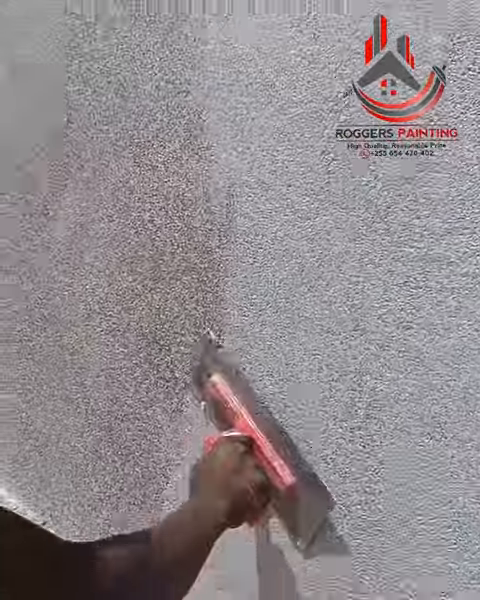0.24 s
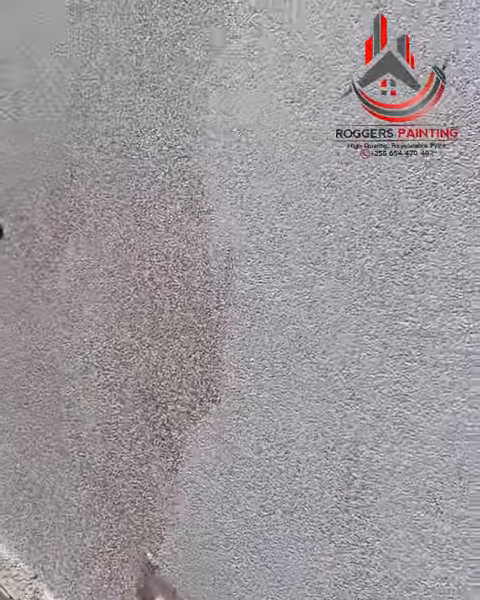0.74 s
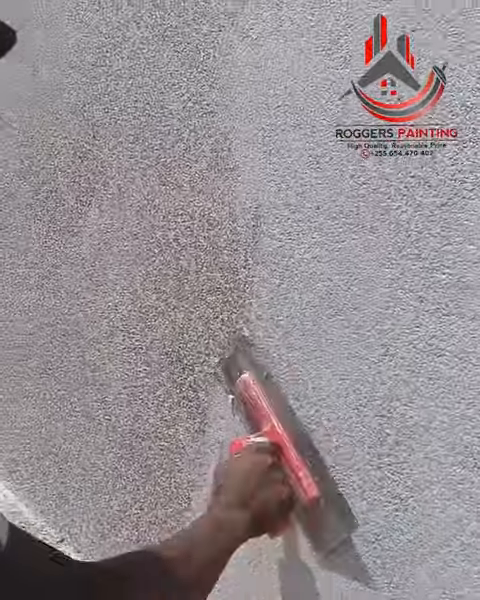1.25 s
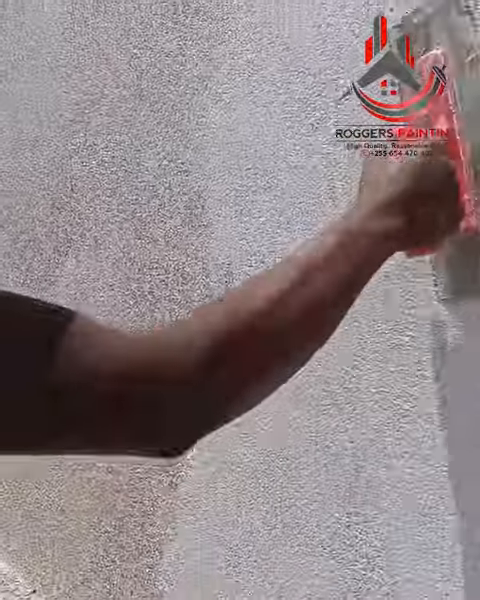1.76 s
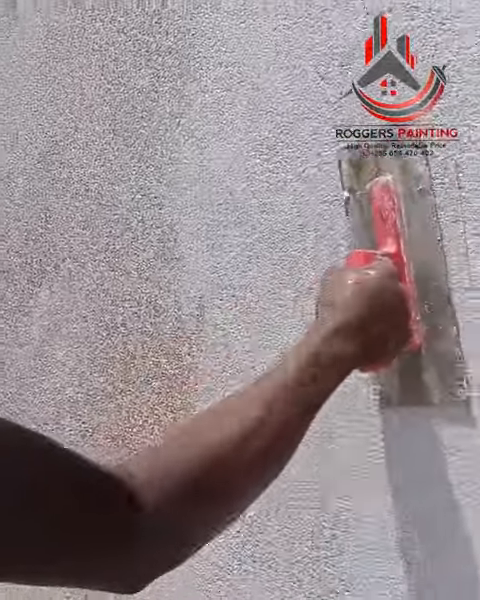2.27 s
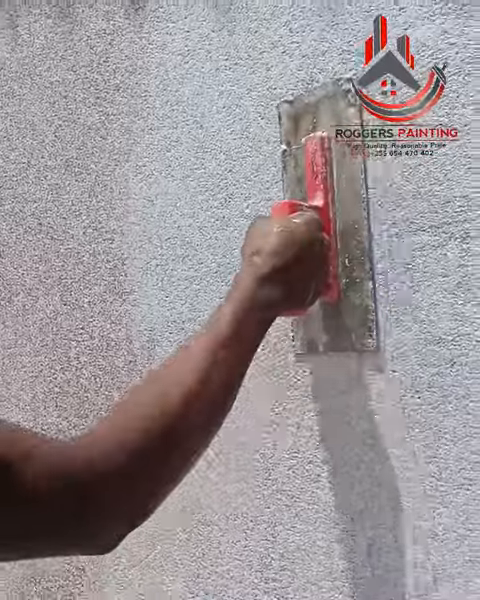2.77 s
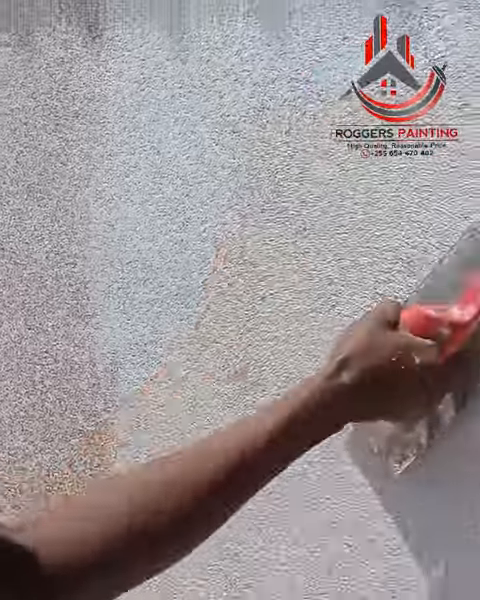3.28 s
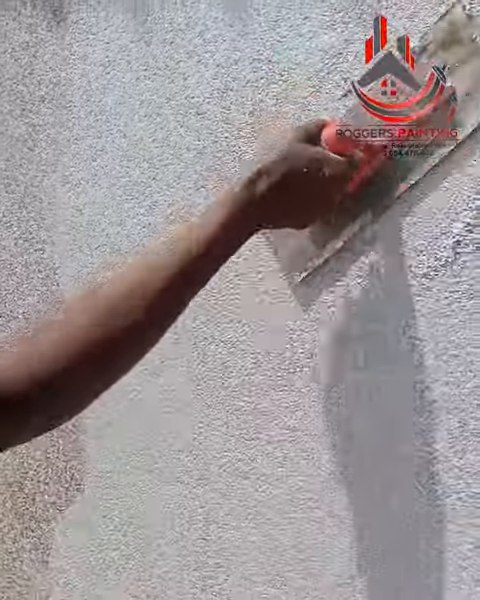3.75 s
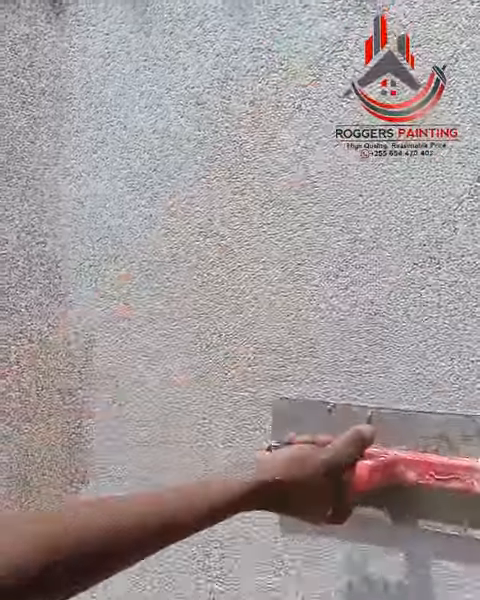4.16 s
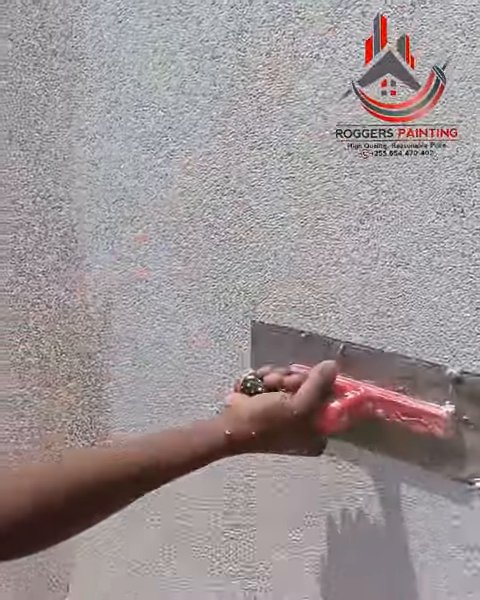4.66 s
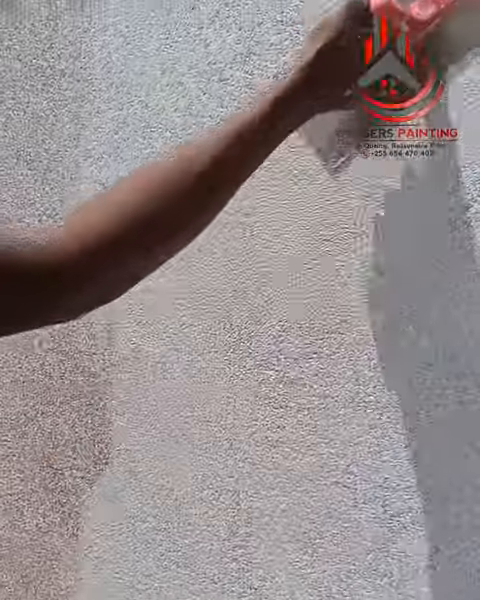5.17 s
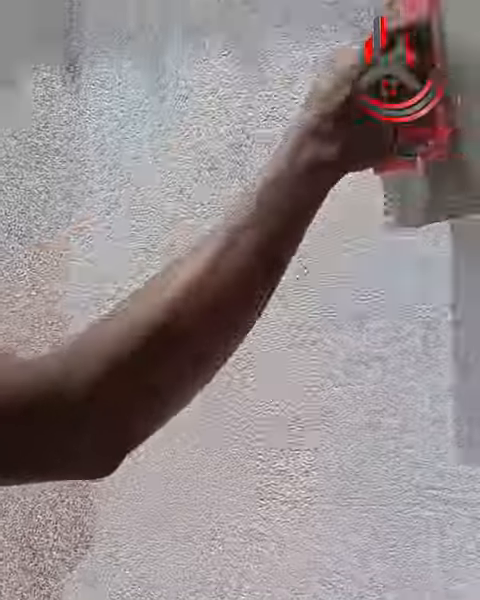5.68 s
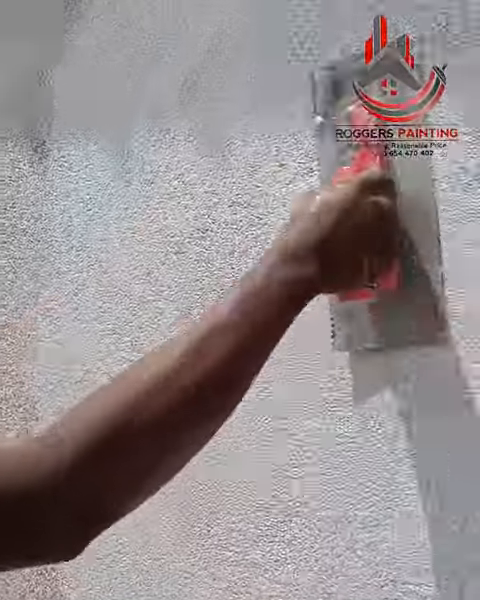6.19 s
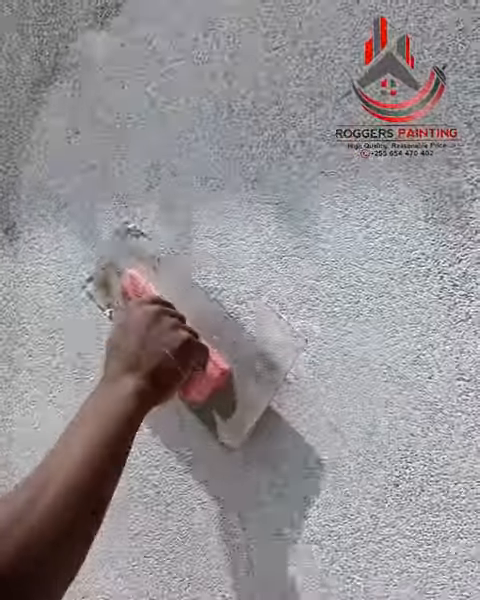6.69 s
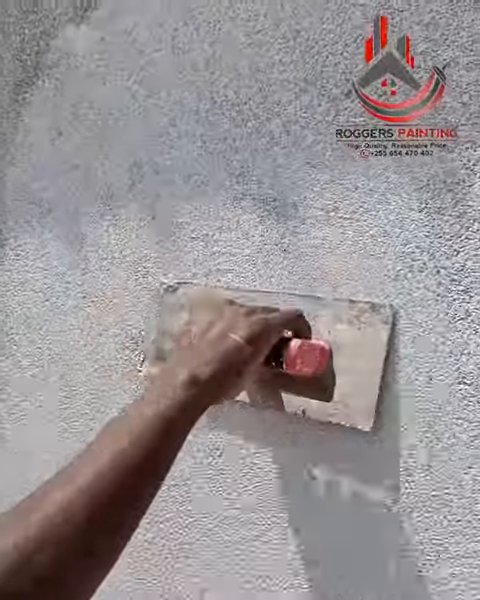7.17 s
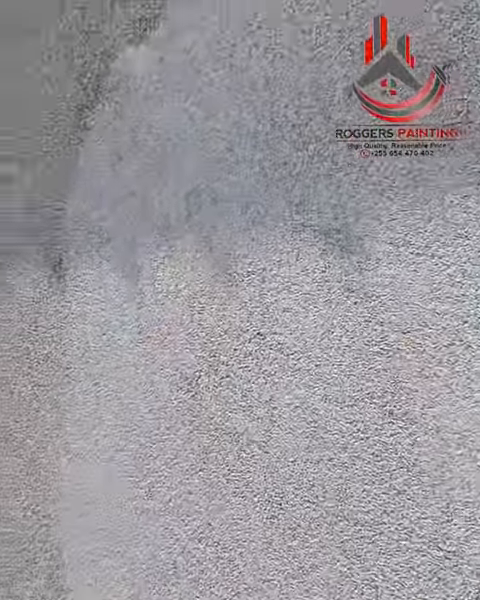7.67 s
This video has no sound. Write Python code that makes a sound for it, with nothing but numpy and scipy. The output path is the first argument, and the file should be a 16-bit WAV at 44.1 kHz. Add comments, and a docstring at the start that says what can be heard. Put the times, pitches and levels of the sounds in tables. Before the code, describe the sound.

Outdoors, close to a wall, a steel plastering trowel makes eight gritty rasping strokes, each around half a second to nearly a second. Sand hisses beneath the blade, which rings dully and clacks when landing or catching stones. Short pauses reveal low wind buffeting. A faint motor hum enters halfway. The close microphone hears a nearly dry sound with only weak, short reflections.

```python
"""Outdoors, close to a wall: a steel trowel rubs sandy coating onto it in eight rasping strokes.
Fine sand, as filtered grain noise, hisses under the blade; coarse grains are random impacts that ring its
well-damped modes; where it lands or catches on a stone it clacks, with weak reflections from nearby surfaces.
Moving air, as shaped noise, buffets the microphone. Far off, a wavering sine hums like a motor,
with faint gliding whines and an uneven hush."""
import sys
import numpy as np
from scipy import signal
from scipy.fft import rfft, irfft, next_fast_len
from scipy.io import wavfile
from scipy.ndimage import uniform_filter1d, map_coordinates

SR = 44100
rng = np.random.default_rng(int(sys.argv[2]) if len(sys.argv) > 2 else 0)


def log_audio(samples):
    """Write samples as a 16-bit WAV file to the path given in sys.argv[1]."""
    # one column per channel
    frames = np.atleast_2d(samples).T
    # limit to full scale, then quantise
    limited = np.clip(frames, -1, 1)
    pcm = np.round(limited * 32767).astype(np.int16)
    wavfile.write(sys.argv[1], SR, pcm)


N = 349829  # length [samples]

# each layer at the wall, relative to the pressure [dB]
SAND_DB, FACE_DB, EDGE_DB, DRAG_DB = -6, -1, -2, -13.5
EDGE_BITE, DRAG_BITE, SAND_BITE = 0.039, 0.71, -0.2  # gained per dB of bite [dB]


def contact(pressure_db, bite_db):
    """Gains of drag, face, edge and sand: all follow the pressure; biting grit favours the low, slow ones."""
    layers_db = np.array([DRAG_DB + DRAG_BITE * bite_db,
                          FACE_DB + bite_db,
                          EDGE_DB + EDGE_BITE * bite_db,
                          SAND_DB + SAND_BITE * bite_db])
    return amp(pressure_db + layers_db)


LIFT_DB_PER_S = 750.5  # the rasp dies this fast as the blade leaves the wall
EASE_S = 0.012  # inertia of the arm


def stroke_gains(hand, t, land_s, lift_s, attack_s, drift_db_per_s):
    """One stroke: the blade settles on the wall, follows the hand as the wrist turns its edge, and lifts off."""
    landing = np.clip((t - land_s) / attack_s, 0, 1)
    envelope = landing * amp(-LIFT_DB_PER_S * np.maximum(t - lift_s, 0))
    ease = max(int(EASE_S * SR), 1)
    pressure_db, bite_db = uniform_filter1d(np.array(curves(hand, t)), ease, axis=1, mode="nearest")
    drag, face, edge, sand = envelope * contact(pressure_db, bite_db)
    turn = amp(drift_db_per_s * (t - (land_s + lift_s) / 2))
    return drag, face, edge * turn, sand / np.sqrt(turn)


# strokes on the wall: (blade lands [s], lifts [s], attack [s], edge ring drift as the wrist turns [dB/s],
# stiffening of the modes [factor], tilt of the face modes [dB/octave], tilt of the sand hiss [dB/octave],
# finest fizz [dB], drag [dB], edge ring [dB])
STROKES = [(0, 0.485, 0.0016, 5.5, 1.007, 5.5, 6, -11, -5, -1),
           (1.12, 1.958, 0.014, 4, 0.986, 2.5, 5, -11.5, -4.5, 0.5),
           (2.222, 2.647, 0.034, 3.5, 1.006, -3, -2.5, -6.5, -0.5, -1),
           (3.008, 3.458, 0.016, -1, 1.006, -8.5, -1, -4.5, -1, -0.5),
           (3.873, 4.503, 0.0099, 7, 0.985, 6, -.5, -2.5, 3.5, -0.5),
           (4.79, 5.608, 0.028, -7, 0.976, -0.5, -5.5, -8.5, 1.5, 0.5),
           (6.286, 6.738, 0.0092, -2, 1.034, -7.5, -4.5, -8, -1, 1),
           (7.15, 7.947, 0.12, -4.5, 0.982, 1.5, -2, -6.5, 2, 1)]
# the hand, one list per stroke: (time [s], pressure as the level of the rasp [dB],
# bite of the coarse grit relative to it [dB])
HAND = [
    [(0.01, -46, 5.0), (0.05, -47.5, -1.5), (0.065, -45, -2), (0.18, -44.5, -1), (0.22, -46.5, -6.5),
     (0.265, -43, -2.5), (0.3, -46, -1), (0.405, -36.5, 0.5), (0.49, -44, 4)],
    [(1.13, -59.5, -2.5), (1.425, -35.5, 3.5), (1.525, -41, -0.5), (1.55, -36.0, 2.5), (1.63, -39.5, -3),
     (1.8, -36.0, -6), (1.86, -43, -12), (1.895, -40.0, 0.5), (1.945, -50, 0)],
    [(2.23, -57, 6.5), (2.255, -58.5, -2.5), (2.285, -54, -1.5), (2.37, -45.5, -18), (2.405, -45.5, -12.5),
     (2.48, -46, -15.5), (2.555, -37.5, -5.5), (2.62, -38.0, -1.5), (2.65, -48, 0)],
    [(3.02, -52, 5.5), (3.05, -53.5, -8.5), (3.13, -44.5, -10.5), (3.155, -48.5, -13.5), (3.28, -42.5, -5),
     (3.315, -46, -6.5), (3.33, -40.5, -4), (3.42, -53.5, -9.5), (3.47, -55.5, -2.5)],
    [(3.885, -58, -10.5), (3.945, -54, -13.0), (3.995, -54, -21.5), (4.015, -49, -7.5), (4.09, -52, -12),
     (4.235, -44.5, -8.5), (4.3, -47.0, -6.5), (4.47, -41, -1), (4.505, -46, 6.5)],
    [(4.805, -56.5, -1), (4.865, -43.0, -2), (5.02, -40, -2.5), (5.09, -41.5, -5), (5.205, -43.0, 1),
     (5.345, -45.5, -6.5), (5.475, -47, -1), (5.495, -48, -10), (5.62, -46.5, 7)],
    [(6.297, -45.5, 10), (6.357, -40, 2.5), (6.412, -45, 2), (6.462, -42.5, -5), (6.527, -47, -7.5),
     (6.622, -41, 1.5), (6.637, -39, 4), (6.697, -39.5, 5), (6.74, -45, 8.5)],
    [(7.2, -50.0, 3.5), (7.245, -53, 2), (7.34, -44, -3), (7.42, -45.5, -7), (7.47, -45, -7),
     (7.51, -47.5, -7.0), (7.67, -40.5, 4), (7.695, -42.5, -1), (7.92, -42.5, 8.0)],
]
# the blade skims the wall between the last two strokes: (time [s], half length [s], pressure [dB], bite [dB])
SKIMS = [(6.799, 0.065, -66.5, 3), (6.888, .028, -57.5, 0), (6.968, .08, -70.5, 4), (7.158, 0.017, -62, -6)]
# modes of the blade pressed on the wall: (frequency [Hz], width [Hz], level [dB])
BLADE_MODES = [(753, 120, -12), (1098.4, 111, 1), (1215, 120, -1.5), (1370, 170, 2), (1594, 180, -3),
               (1830, 140, -4), (2126, 320, 5), (2485, 170, 4), (2730, 330, 4.5), (3170, 240, -5)]
FACE_COUNT = 6  # the first modes bend the face, the rest ring along the edge
# spectra of the sand hiss, the finest fizz and the drag: (frequency [Hz], density [dB per Hz])
SAND_SPECTRUM = [(900, -36.5), (2200, -8), (3400, 3), (4300, 1), (5500, -1.5), (6600, 0), (7050, -6.5),
                 (7600, -22), (8700, -32), (11000, -24), (13200, -19.5), (15800, -17)]
FIZZ_SPECTRUM = [(7000, -45), (10000, -22), (13200, -23.5), (14100, -16.5), (14900, 3), (15800, -5.5)]
DRAG_SPECTRUM = [(100, -36.5), (260, -12), (450, -0.5), (750, 1.5), (1100, 0), (2000, -30), (5000, -61)]


def scraping():
    """The blade rides over bumps in the coating, crushing fine sand and rolling coarse grit."""
    bumps = unit(wobble(45) + 0.56 * wobble(170))
    grit = grains(rate=2000, spread_db=1.0) * amp(1.4 * bumps)
    small_grit = grit + 0.51 * grains(rate=4500, spread_db=1.0) * amp(1.3 * bumps)
    fine = grains(rate=15000, spread_db=0.5) * amp(0.96 * bumps) * rng.standard_normal(N)
    rub = steady(coloured(grit * rng.standard_normal(N), DRAG_SPECTRUM))
    hiss = coloured(fine, SAND_SPECTRUM)
    hiss = steady(shifting(hiss, depth_db=2.5, patch_hz=138.1, patch_s=0.06))
    fizz = coloured(fine, FIZZ_SPECTRUM)
    fizz = steady(shifting(fizz, depth_db=1.5, patch_hz=200, patch_s=0.04)) * amp(wobble(25))

    def rasp(i, gains, stiffen=1, face_tilt_db=-3, sand_tilt_db=-3, fizz_db=-14, drag_db=3, edge_db=-3):
        """Coarse grit drives the slow bending modes, smaller grit the fast ones, over drag and sand."""
        drag, face, edge, sand = gains
        low_ring = ring(grit[i], BLADE_MODES[:FACE_COUNT], stiffen)
        low_ring = tilted(low_ring, face_tilt_db, low_hz=1100, high_hz=2200)
        low_ring = steady(shifting(low_ring, depth_db=3.3, patch_hz=120.4, patch_s=0.04), span=0.05)
        high_ring = ring(small_grit[i], BLADE_MODES[FACE_COUNT:], stiffen)
        high_ring = steady(shifting(high_ring, depth_db=2.5, patch_hz=148.8, patch_s=0.04), span=0.044)
        sand_noise = tilted(hiss[i], sand_tilt_db, low_hz=3540, high_hz=7000) + amp(fizz_db) * fizz[i]
        return (face * low_ring + amp(edge_db) * edge * high_ring
                + amp(drag_db) * drag * rub[i] + sand * sand_noise)

    out = np.zeros(N)
    for hand, (land_s, lift_s, attack_s, drift_db_per_s, *tone) in zip(HAND, STROKES):
        i = samples(land_s, lift_s + 0.1)
        gains = stroke_gains(hand, i / SR, land_s, lift_s, attack_s, drift_db_per_s)
        out[i] += rasp(i, gains, *tone)
    for s, half_s, pressure_db, bite_db in SKIMS:
        i = samples(s - 2 * half_s, s + 2 * half_s)
        gains = np.outer(contact(pressure_db, bite_db), swell(i / SR, s, half_s))
        out[i] += rasp(i, gains)
    return out


# the blade lands or catches on a stone: (time [s], level before a 5 dB cut [dB], edge ring [dB])
CLACKS = [(0.0648, -16, -21.5), (0.396, -26.5, 2), (1.1253, -38.5, 6.5), (1.2002, -31.5, -7),
          (1.342, -28, -21), (1.543, -30, -6), (1.7106, -26, 7), (2.225, -32, -1), (2.2869, -26, -2),
          (2.405, -28.5, 6.5), (2.5438, -31, 6.5), (3.0102, -24, -3.5), (3.2002, -35, 11),
          (3.2748, -29.5, 9.5), (3.3295, -28, -1), (3.339, -32, -0.5), (3.4634, -29, 5),
          (3.8848, -35.5, -3.5), (4.4476, -26, 5.5), (4.48, -23.5, -20), (4.492, -27, -17),
          (4.806, -31.5, 0), (5.008, -28, -6), (5.6133, -28, -11.5), (6.235, -26.5, 0.5), (6.2953, -22, -6),
          (6.3263, -25.5, -13), (6.354, -24, -9), (6.365, -17, -8.5), (6.633, -34, -12.5),
          (6.733, -26.5, 1.5), (7.2079, -30.5, -4), (7.3195, -26, -5.5)]
# spectrum of the crunch: (frequency [Hz], density [dB per Hz])
CRUNCH_SPECTRUM = [(250, -7), (700, -5), (2500, 6.5), (4500, -0.5), (6700, -0.5), (7800, -51),
                   (13500, -28.5), (15500, -5.5)]
CHATTER_T60_S = 0.04


def clacks(crunch_t60_s=0.075, crunch_db=-6, graze_s=0.0046):
    """Steel meets stone: it grazes the sand, then a blow and a quick chatter ring the blade."""
    lead = SR // 50  # samples before the blow
    t = np.arange(-lead, SR // 8) / SR
    out = np.zeros(N + SR)
    since = np.maximum(t, 0)
    approach = np.exp(np.minimum(t, 0) / graze_s)
    for s, db, edge_db in CLACKS:
        chatter = rng.random(len(t)) < 900 / SR  # 900 taps a second
        force = chatter * approach ** 2 * amp(-60 * since / CHATTER_T60_S)
        force[lead] = 2.3  # the blow itself
        crushing = rng.standard_normal(len(t)) * approach * amp(-60 * since / crunch_t60_s)
        crunch = coloured(crushing, CRUNCH_SPECTRUM)
        # a sharper contact is brighter and crushes more sand
        edge = unit(ring(force, BLADE_MODES[FACE_COUNT:])) + amp(crunch_db) * crunch
        hit = unit(ring(force, BLADE_MODES[:FACE_COUNT])) + amp(edge_db) * edge
        start = round((s - 0.001) * SR) - lead
        out[start:][:len(t)] += amp(db - 5.0) * hit / np.abs(hit).max()
    return out[:N]


# decay of the surfaces nearby: (frequency [Hz], t60 [s])
ROOM_DECAY = [(200, 0.037), (1500, .12), (6000, 0.036), (15000, 0.011)]


def room(x):
    """Weak, short reflections from the surfaces nearby: noise decaying at its own speed in each band."""
    hz, t, z = signal.stft(rng.standard_normal(SR // 3), SR, nperseg=256)
    decay = amp(-60 * t / along(ROOM_DECAY, hz)[:, None])
    tail = signal.istft(z * decay, SR, nperseg=256)[1]
    delayed = np.pad(x, (SR // 300, 0))
    return signal.fftconvolve(delayed, tail / np.linalg.norm(tail))[:N]


# the breeze at the microphone rises and drops: (time [s], level before wobble and a 3.5 dB lift [dB])
BREEZE = [(0, -68.5), (.95, -68), (1.45, -50.5), (2.0, -68), (3.0, -64.5), (4.1, -55.5), (4.9, -74),
          (5.7, -62.5), (6.15, -77.5), (7.93, -69)]
# gusts on top of it: (time [s], half length [s], buffeting before the same lift [dB],
# small eddies relative to it, before their own trim and wobble [dB])
GUSTS = [(0.136, 0.037, -59.5, -12), (0.457, 0.15, -64.5, -12), (0.704, 0.016, -61, -32),
         (0.83, 0.034, -65.5, -1.5), (1.042, 0.027, -59, -17), (1.307, 0.089, -51, -0.5),
         (1.758, 0.013, -51, 0), (1.865, 0.047, -52.5, 2.5), (2.125, 0.082, -53, -3), (2.44, 0.041, -55, 3),
         (2.574, 0.038, -54, -1), (3.144, 0.027, -52.5, -3.5), (3.35, 0.027, -59, 1),
         (3.479, 0.025, -57, 4), (3.658, 0.039, -53, -4.5), (3.874, 0.054, -47.5, 5.5),
         (3.967, 0.026, -47, 7), (4.085, 0.052, -43, 0.5), (4.24, 0.016, -55, 5), (4.522, 0.075, -54.5, -3),
         (5.44, 0.062, -50, 0.5), (5.676, 0.094, -53, -6), (5.927, 0.027, -62.5, -8),
         (6.323, 0.053, -58, 3), (6.928, 0.019, -56, -15)]
# spectra of buffeting and eddies: (frequency [Hz], density [dB per Hz])
BUFFET_SPECTRUM = [(12, -41), (25, -26), (35, -15.5), (55, -3.5), (90, 1.5), (140, 2), (200, -11.5),
                   (300, -31), (450, -39.5), (900, -77)]
EDDY_SPECTRUM = [(50, -40), (110, -6), (170, 4), (270, 0.5), (400, -11.5), (600, -38.5), (1200, -79)]
# eddies relative to a breeze of CALM_DB, and their dB per dB of breeze
CALM_DB, BREEZE_EDDIES_DB, EDDIES_GROW = -62, -10.5, 2


def breeze():
    """A breeze and its gusts make lumpy turbulence on the microphone port."""
    t = np.arange(N) / SR
    breeze_db = curves(BREEZE, t)[0] + 3.1 * wobble(21)
    buffet = amp(breeze_db)
    eddies = amp(CALM_DB + BREEZE_EDDIES_DB + EDDIES_GROW * (breeze_db - CALM_DB))
    for s, half_s, db, eddy_db in GUSTS:
        i = samples(s - 2 * half_s, s + 2 * half_s)
        gust = amp(db) * swell(t[i], s, half_s)
        buffet[i] = np.hypot(buffet[i], gust)
        eddies[i] = np.hypot(eddies[i], amp(eddy_db) * gust)
    rumble = steady(coloured(rng.standard_normal(N), BUFFET_SPECTRUM), span=0.098)
    flutter = steady(coloured(rng.standard_normal(N), EDDY_SPECTRUM), span=0.06)
    return amp(3.5) * buffet * rumble + amp(-3 + 4.4 * wobble(40)) * eddies * flutter


# sudden puffs on the microphone, the first a low thud of the blade catching on the wall: # (time [s], peak
# level [dB], centre [Hz], length [cycles])
PUFFS = [(3.337, -37, 450, 0.71), (3.87, -36.5, 194, 1), (3.961, -38.5, 302, 0.62), (4.081, -39, 170, 0.72),
         (4.0987, -27.5, 310, 0.49), (4.106, -30, 190, 0.86), (6.923, -42, 424, 2.4), (6.93, -47, 129, 1.3)]


def puffs():
    """Round puffs of air, and one low thud of the blade: short swings of pressure under a bell-shaped envelope."""
    out = np.zeros(N)
    half = SR // 50
    for s, db, hz, length in PUFFS:
        cycles = hz * np.arange(-half, half) / SR
        puff = np.sin(2 * np.pi * cycles) * np.exp(-np.pi * (cycles / length) ** 2)
        out[round(s * SR) - half:][:2 * half] += amp(db) * puff / np.abs(puff).max()
    return out


# speed and level of the distant motor, both with wobble added:
# (time [s], pitch [Hz], level before a 0.4 dB cut [dB])
MOTOR = [(4.65, 119.0, -56), (5.0, 121.6, -66), (5.25, 120.9, -63.5), (5.85, 122.5, -54.5),
         (6.15, 118.9, -65.5), (6.55, 121.5, -65.5), (6.85, 122.4, -57.5), (7.1, 117.8, -59.5),
         (7.75, 113.6, -57.5)]
MOTOR_START_S, MOTOR_RISE_S = 3.9, 0.5  # it sets in


def motor():
    """A far motor's hum: one sine whose pitch and level waver."""
    t = np.arange(N) / SR
    running = np.clip((t - MOTOR_START_S) / MOTOR_RISE_S, 0, 1)
    hz, db = curves(MOTOR, t)
    level = running * amp(db - 0.4 + 1.2 * wobble(11))
    return level * np.sqrt(2) * np.sin(2 * np.pi * np.cumsum(hz + 0.8 * wobble(12)) / SR)


# faint far-off whines: (start [s], end [s], start pitch [Hz], end pitch [Hz], peak level [dB])
WHINES = [(0.552, 1.898, 322, 344, -79.5), (2.25, 3.3, 211, 213, -67.5), (4.487, 5.95, 300, 318, -74)]


def whines():
    """Faint gliding sines with a slightly unsteady pitch."""
    t = np.arange(N) / SR
    out = np.zeros(N)
    for start, end, start_hz, end_hz, db in WHINES:
        pitch = np.interp(t, [start, end], [start_hz, end_hz]) + 1.4 * wobble(20)
        fade = np.clip(np.minimum(t - start, end - t) / 0.081, 0, 1)
        out += amp(db) * fade * np.sin(2 * np.pi * np.cumsum(pitch) / SR)
    return out


# the faint outdoor hush drifts: (time [s], level before wobble [dB])
HUSH = [(0, -73), (.95, -85), (2.1, -77.5), (3.6, -82), (4.7, -78), (5.75, -79.5), (6.1, -83.5),
        (7.93, -68.5)]
# its spectrum: (frequency [Hz], density [dB per Hz])
HUSH_SPECTRUM = [(100, -1.5), (300, -8), (550, -12), (850, -11), (1250, -5), (1700, -6), (2800, -12),
                 (4500, -18), (6500, -20), (8500, -42.5), (15500, -30.5)]


def hush():
    """Uneven outdoor hush: shaped noise drifting in level."""
    noise = coloured(rng.standard_normal(N), HUSH_SPECTRUM)
    noise = shifting(noise, depth_db=0.5, patch_hz=263, patch_s=0.08)
    return amp(curves(HUSH, np.arange(N) / SR)[0] + 1.9 * wobble(5)) * noise


def resonance(f, hz, width):
    """A damped mode with steep skirts: a narrow and a broad resonator in a row."""
    detuning, loss = hz * hz - f * f, 1j * f * width
    return 5 * loss * loss / ((detuning + loss) * (detuning + 5 * loss))


def ring(force, modes, stiffen=1):
    """Each impact meets the blade at another spot, so it drives each mode with its own strength."""
    out = np.zeros(len(force))
    for hz, width, db in modes:
        drive = force * rng.standard_normal(len(force))
        out += amp(db) * filtered(drive, lambda f: resonance(f, hz * stiffen, width))
    return out


def grains(rate, spread_db):
    """Random impacts, rate a second, of scattered sizes."""
    hit = rng.random(N) < rate / SR
    return hit * amp(spread_db * np.clip(rng.standard_normal(N), -2, 2))


def steady(x, span=0.073):
    """Evens out the level over span seconds; faster roughness stays."""
    power = np.abs(uniform_filter1d(x * x, max(int(span * SR), 8)))
    return x / np.sqrt(power + 1e-3 * np.mean(x * x))


def shifting(x, depth_db=2.6, patch_hz=130, patch_s=0.04):
    """Narrow bands of x swell and fade at random, as resonances do when a contact moves."""
    hz, t, z = signal.stft(x, SR, nperseg=1024)
    field = rng.standard_normal((int(hz[-1] / patch_hz) + 3, int(t[-1] / patch_s) + 3))
    where = np.meshgrid(hz / patch_hz, t / patch_s, indexing="ij")
    gain_db = depth_db * map_coordinates(field, where, order=2)
    return signal.istft(z * unit(amp(gain_db)), SR, nperseg=1024)[1][:len(x)]


def tilted(x, tilt_db, low_hz, high_hz):
    """x tilted by tilt_db per octave between two frequencies, at rms 1."""
    return unit(filtered(x, lambda hz: amp(tilt_db * np.log2(np.clip(hz, low_hz, high_hz) / low_hz))))


def coloured(x, spectrum):
    """x filtered by the given spectrum, at rms 1."""
    return unit(filtered(x, lambda hz: amp(along(spectrum, hz))))


def filtered(x, response):
    """x times a complex response of frequency."""
    m = next_fast_len(len(x) + 2048, True)
    return irfft(rfft(x, m) * response(np.fft.rfftfreq(m, 1 / SR)), m)[:len(x)]


def wobble(rate, order=3):
    """A smooth random curve, rate knots a second."""
    coarse = np.linspace(0, N, N // 32)
    knots = rng.standard_normal(int(N * rate / SR) + 4)
    return np.interp(np.arange(N), coarse, map_coordinates(knots, [coarse * rate / SR], order=order))


def swell(t, s, half_s):
    """A bell-shaped rise and fall round the time s."""
    return np.exp(-np.minimum(((t - s) / half_s) ** 2, 50))


def curves(rows, t):
    """Each column after the time, read at the times t."""
    s, *cols = np.transpose(rows)
    return [np.interp(t, s, c) for c in cols]


def along(points, hz):
    """(Hz, value) points read on a log axis."""
    f, v = np.transpose(points)
    return np.interp(np.log(hz + 1), np.log(f), v)


def samples(start_s, end_s):
    """Sample numbers between two times."""
    return np.arange(max(int(start_s * SR), 0), min(int(end_s * SR), N))


def amp(db):
    """Decibels to gain."""
    return 10 ** (np.asarray(db) / 20)


def unit(x):
    """x at rms 1."""
    return x / np.sqrt(np.mean(x ** 2) + 1e-20)


def scene():
    """The trowel close by, over moving air at the microphone and the distant background."""
    trowel = scraping() + clacks()
    air = breeze() + puffs()
    background = motor() + whines() + hush()
    return (trowel + amp(-16) * room(trowel) + air + background)[None]


TOP_HZ = 15800  # band limit


def record(dry):
    """The recorder keeps nothing above its band limit."""
    return np.array([filtered(channel, lambda hz: hz < TOP_HZ) for channel in dry])


dry = scene()
out = record(dry)
log_audio(out)
```